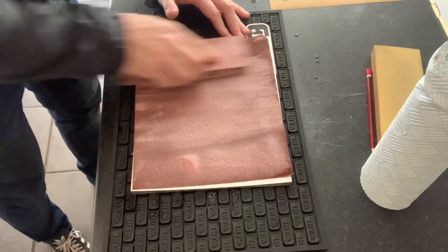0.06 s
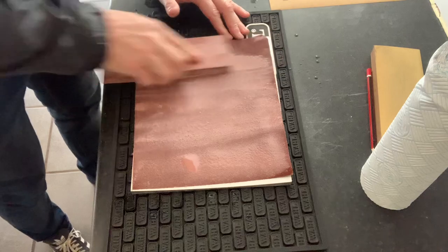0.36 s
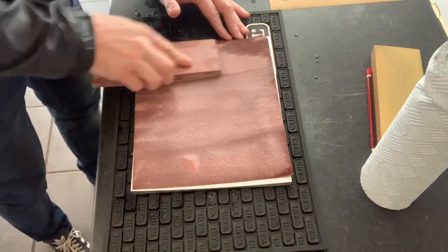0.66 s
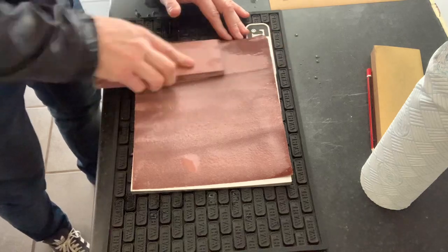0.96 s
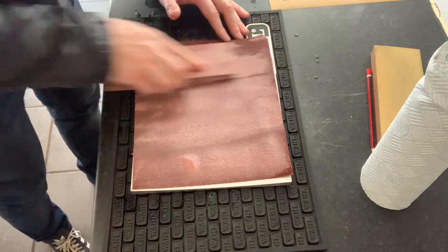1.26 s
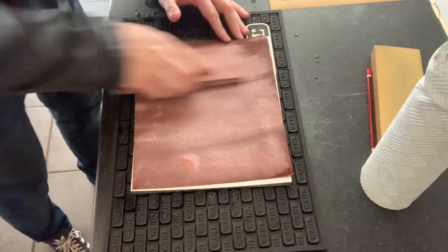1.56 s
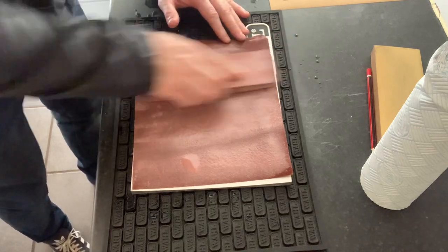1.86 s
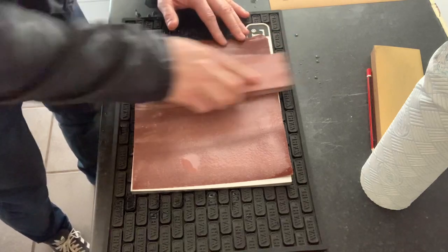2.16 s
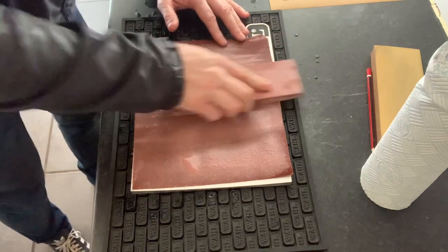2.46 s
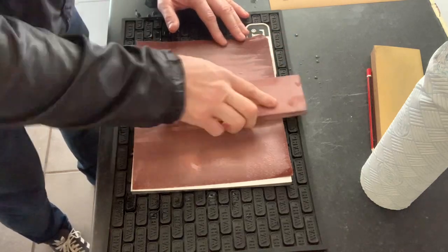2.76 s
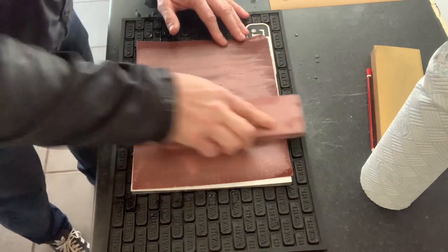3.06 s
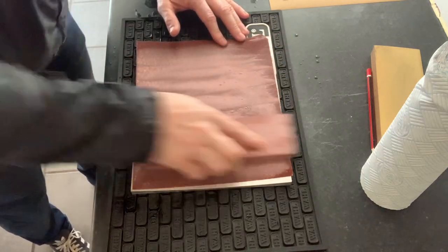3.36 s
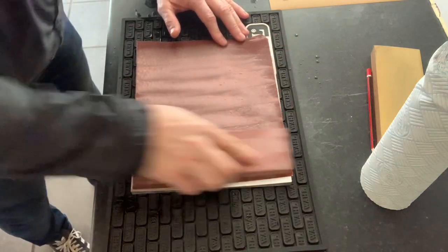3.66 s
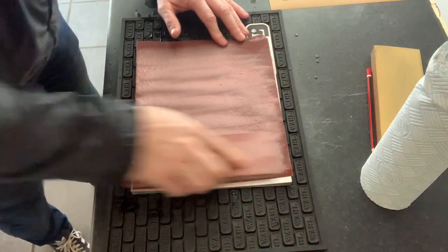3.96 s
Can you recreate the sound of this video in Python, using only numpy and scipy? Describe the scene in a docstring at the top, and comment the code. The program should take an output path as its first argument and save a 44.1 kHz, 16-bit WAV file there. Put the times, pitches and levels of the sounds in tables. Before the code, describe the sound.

A small sharpening stone rubs back and forth on an abrasive sheet for all four seconds, about six gritty, slightly ringing strokes a second, easing a little later on. Its edge catches sharply several times in the first second and again at 2 seconds. The desk rumbles faintly with each turn. A low hum swells from 0.5 seconds and fades by 1.7. The sound is close, in a small room.

```python
"""A small sharpening stone rubs to and fro on an abrasive sheet on a desk, about six strokes a second.
Grit catches under it, louder and brighter with speed, and rings the stone and the sheet's backing.
Each turn shakes the desk; at some the stone's edge bites. Hollow resonances flare in the scrape.
A low hum swells and fades in the small room. Two microphone ports hear it from close above."""
import sys
import numpy as np
from scipy import signal
from scipy.fft import rfft, irfft, next_fast_len
from scipy.io import wavfile
from scipy.ndimage import uniform_filter1d, map_coordinates

SR = 44100
rng = np.random.default_rng(int(sys.argv[2]) if len(sys.argv) > 2 else 0)


def file_out(sig):
    """Save sig as 16-bit WAV at sys.argv[1]."""
    # one column per channel
    cols = np.atleast_2d(sig).T
    # limit, then scale
    lim = np.clip(cols, -1, 1)
    pcm = np.round(lim * 32767).astype(np.int16)
    wavfile.write(sys.argv[1], SR, pcm)


N = 176400

# push and pull in turn: (start [s], gain [dB], bass [dB], treble [dB], growth over the stroke [dB])
STROKE_PLAN = [ (.018, -24.7, -.8, 0, .5), (.176, -28.2, 0, .8, -1.5), (.34, -23.9, 0, .4, 1.5),
               (.51, -26.2, -1, -.8, -2), (.669, -23.9, -1, -1.8, -.5), (.837, -27, .3, .7, .5),
               (.997, -24.3, 1.2, .4, 0), (1.161, -27.4, -1.2, .9, -3.5), (1.329, -24.7, .2, -2.3, 0),
               (1.483, -28.1, 1.3, -.6, -1), (1.648, -26.4, 1.5, 2, -2), (1.812, -27.7, 0, .5, -1),
               (1.981, -27.4, 1.5, .7, .5), (2.14, -28.7, -2, .6, 0), (2.303, -27, .8, -1, 0),
               (2.462, -28, .5, -.3, 0), (2.626, -26.5, .6, -1, 1), (2.789, -28.9, .8, -1, 1),
               (2.951, -25.9, -2, -1.6, .5), (3.105, -28.6, .3, -.8, -2.5), (3.262, -27.1, -2, .3, -2),
               (3.419, -29.3, -.2, -.9, -1), (3.577, -27.3, -1, 2.4, .5), (3.727, -30.9, .8, 3.8, -3),
               (3.881, -27.2, -1.2, -.6, 1), ]
# stone modes: (frequency [Hz], width [Hz], gain [dB])
STONE_MODES = [(1670, 90, -20.5), (1890, 90, -20.5), (2375, 60, -18.5), (2860, 70, -17.5),
               (3170, 380, -13.5), (4140, 45, -18.5), (5710, 110, -11), (5860, 130, -11), (7650, 120, -10),
               (9820, 120, -8.5), (12210, 80, -13.5), (14860, 100, -28)]
# grit rasp: (frequency [Hz], relative density [dB])
RASP_SPECTRUM = [(150, -16), (330, -17), (650, -12.5), (850, -13), (1500, -4.8), (2000, -2), (2600, -2.4),
                 (3500, -1.6), (4900, -2.8), (6100, -2), (6700, -5.5), (7400, -3.5), (8200, -.8),
                 (9500, -2), (10500, -5.5), (12000, -5.3), (13000, -16), (14600, -26), (15600, -38)]
# speed exponents of the rasp's amplitude: (bass [-], middle [-], treble [-])
RASP_EXPONENTS = [.55, .72, 1.55]
# speed exponents of the stone modes' amplitude: (low [-], high [-])
RING_EXPONENTS = [0.86, 1.86]
# backing modes: (frequency [Hz], width [Hz], relative level [dB])
BACKING_MODES = [(392, 67, -2), (707, 87, -3), (958, 29, -1), (1180, 81, 0.5), (1277, 320, 2.5)]
# backing, stronger as the strokes move forward: (time [s], gain [dB])
BACKING_GAIN_DB = [(0, -47), (1.2, -52.5), (1.8, -43), (2.7, -42), (4, -43.5)]
# desk rumble: (frequency [Hz], relative density [dB])
DESK_SPECTRUM = [(22, -56), (31, -43), (38, -8), (48, 0.5), (62, -5.5), (72, -7.5), (88, 0), (108, -13.5),
                 (140, -17), (185, -21.5), (400, -36.5)]
# desk shudder: (time [s], gain [dB])
DESK_GAIN_DB = [(0, -42), (1.2, -39.5), (2, -41.5), (2.7, -43.5), (3.3, -44), (3.85, -38)]
# edge bites: (time [s], gain [dB])
BITE_EVENTS = [(.182, -30), (.352, -33), (0.521, -26), (.683, -42), (0.845, -28.5), (1.996, -28),
               (2.318, -46), (2.472, -46), (2.803, -48), (3.272, -38), (3.428, -51), (3.735, -43)]
# bite noise: (frequency [Hz], relative density [dB])
BITE_SPECTRUM = [(200, -19), (1200, -3.5), (2000, 10.5), (3200, 1), (4500, -30), (5800, -28), (6700, -14),
                 (7700, 11), (8800, -28), (9700, 6), (11000, -25), (15000, -32)]
# hollow flares: (time [s], half length [s], frequency [Hz], width [Hz], gain [dB])
FLARE_EVENTS = [(.2, .017, 3080, 450, -28), (.46, .03, 2950, 250, -32), (.537, .013, 3200, 500, -28),
                (.785, .03, 1900, 250, -38), (.91, .05, 1720, 350, -37), (1.09, .05, 1900, 300, -35),
                (1.59, .03, 2430, 150, -37), (1.756, .026, 4145, 45, -29), (1.857, .021, 4160, 45, -31),
                (2.064, .06, 4130, 60, -38), (2.36, .04, 3000, 400, -35), (2.55, .06, 1480, 280, -40),
                (2.558, .06, 4140, 60, -40), (2.704, .05, 4152, 60, -36), (2.69, .025, 2800, 700, -33),
                (2.744, .035, 376, 90, -41), (2.87, .05, 1500, 280, -40), (3.016, .035, 2807, 200, -30),
                (3.246, .021, 699, 120, -44), (3.396, .022, 550, 120, -46), (3.79, .05, 1640, 120, -42)]
# hum: (time [s], pitch [Hz], level [dB])
HUM_TRACK = [(.3, 43.7, -60), (.53, 45.6, -41), (.74, 46, -37), (.88, 47.3, -30), (1.08, 49.2, -27.5),
             (1.22, 50.5, -35), (1.56, 50.5, -34), (1.73, 50.4, -52), (2.2, 50.4, -47), (4, 50, -58)]
# room decay: (frequency [Hz], T60 [s])
ROOM_T60_S = [(200, 0.46), (2000, 0.18), (6000, 0.39), (12000, 0.014)]
# room tone: (frequency [Hz], relative density [dB])
AIR_SPECTRUM = [(30, -30), (100, -3), (300, -4), (1000, -9), (4000, -19), (15000, -40)]
# likeness of the ports: (frequency [Hz], coherence [-])
PORT_COHERENCE = [(60, .95), (200, .86), (450, .62), (1200, .56), (2000, .6), (3300, .42), (5300, .25),
                  (5780, .75), (6600, .35), (7600, .87), (8300, 1), (9500, .99), (10200, .92), (11000, .62),
                  (11700, .7), (12600, 1)]
# phase between the ports: (frequency [Hz], left lead [rad])
PORT_LEAD_RAD = [(260, 0), (520, -1.5), (950, -.6), (1810, -.5), (2700, -1.6), (4130, -1.1), (4600, -2),
                 (5300, -1.7), (5780, -2.8), (6400, -4.3), (8200, -3.2), (10200, -3.05), (11000, -1.7),
                 (12200, -.9), (12500, 0)]

BASS_EDGE_HZ, TREBLE_EDGE_HZ = 2300, 7050
TIME_S = np.arange(N) / SR


def amp(db):
    return 10 ** (np.asarray(db) / 20)


def unit_rms(x):
    return x / np.sqrt(np.mean(x ** 2) + 1e-20)


def log_interp(points, hz):
    knots_hz, values = np.transpose(points)
    return np.interp(np.log(hz + 1), np.log(knots_hz + 1), values)


def curves(rows):
    """Per-sample values of each column after the time."""
    knots_s, *columns = np.transpose(rows)
    return [np.interp(TIME_S, knots_s, column) for column in columns]


def wobble(rate_hz):
    """Smooth random curve."""
    return map_coordinates(rng.standard_normal(int(N * rate_hz / SR) + 4), [TIME_S * rate_hz])


def bell(offset_s, half_s):
    return np.exp(-(offset_s / half_s) ** 2)


def filtered(x, response):
    size = next_fast_len(N + SR // 2)
    return irfft(rfft(x, size) * response(np.fft.rfftfreq(size, 1 / SR)), size)[..., :N]


def coloured(x, spectrum):
    return unit_rms(filtered(x, lambda f: amp(log_interp(spectrum, f))))


def resonance(x, hz, width_hz):
    return unit_rms(filtered(x, lambda f: 1j * f * width_hz / (hz * hz - f * f + 1j * f * width_hz)))


def snag(age_s, rise_s=.003, fall_s=.026):
    """Envelope of a catch: grips at once, lets go more slowly."""
    age_s = np.maximum(age_s, 0)
    return (1 - np.exp(-age_s / rise_s)) * bell(age_s, fall_s)


def hand(end_s=4.03, grip=1.15, creep=.1):
    """Stroke motion: time since the turn, position, speed, and overall, bass and treble gains."""
    start_s, gain_db, bass_db, treble_db, growth_db = np.transpose(STROKE_PLAN)
    turns_s = np.r_[2 * start_s[0] - start_s[1], start_s, end_s]
    count = np.interp(TIME_S, turns_s, np.arange(-1, len(start_s) + 1))
    stroke = np.clip(count.astype(int), 0, len(start_s) - 1)
    phase = count % 1
    since_turn_s = TIME_S - start_s[stroke]
    arc = np.sin(np.pi * phase ** .94)  # peaks before mid-stroke
    arc = arc ** np.where(stroke % 2, 1.11, 1.25)  # push more peaked than pull
    speed = np.hypot(np.tanh(grip * arc), creep)  # levels off; never zero
    speed += .15 * snag(since_turn_s - .011)  # sticks, then breaks loose
    gains = amp([gain_db[stroke] + growth_db[stroke] * (phase - .5), bass_db[stroke], treble_db[stroke]])
    return since_turn_s, np.cos(np.pi * count), speed, *uniform_filter1d(gains, size=400, axis=1)


def grit_impacts(speed, rate_hz=14000, spread_db=3.5, judder_db=.32, uneven_db=.7):
    """Two streams of tiny impacts of uneven size, denser with speed."""
    density_hz = rate_hz * np.sqrt(speed)
    hits = rng.random((2, N)) < density_hz / SR
    sizes = amp(spread_db * np.clip(rng.standard_normal((2, N)), -3, 2.5))
    signs = rng.choice([-1, 1], (2, N))
    flutter = amp(judder_db * wobble(220) + uneven_db * wobble(29.92))
    return unit_rms(hits * sizes * signs / np.sqrt(density_hz)) * flutter


def stone_ring(speed, gain, wander_db=2.4, stroke_share=.96):
    """Grit rings the stone's modes, which wax and wane as the contact shifts."""
    grit = grit_impacts(speed)
    ring = 0
    for hz, width_hz, db in STONE_MODES:
        mode = unit_rms(amp(wander_db * wobble(11)) * resonance(grit, hz, width_hz))
        exponent = np.interp(hz, [BASS_EDGE_HZ, TREBLE_EDGE_HZ], RING_EXPONENTS)
        ring += mode * amp(db) * speed ** exponent
    return (stroke_share * gain + (1 - stroke_share) * gain.mean()) * ring


def streaked(x, depth_db=2.7):
    """Narrow-band streaks of random gain, each about half a stroke long."""
    frames = signal.stft(x, nperseg=1024)[2]
    streaks = uniform_filter1d(rng.standard_normal(frames.shape[1:]), size=2, axis=0)
    streaks = unit_rms(uniform_filter1d(streaks, size=9, axis=1))
    return unit_rms(signal.istft(frames * amp(depth_db * streaks), nperseg=1024)[1][:, :N])


def grit_rasp(speed, gain, bass_gain, treble_gain, trim_db=1.2):
    """Rubbing noise in three bands; the treble needs the most speed."""
    rub = amp(trim_db) * streaked(coloured(grit_impacts(speed), RASP_SPECTRUM))
    bass = filtered(rub, lambda f: 1 / (1 + (f / BASS_EDGE_HZ) ** 4))
    treble = filtered(rub, lambda f: 1 - 1 / (1 + (f / TREBLE_EDGE_HZ) ** 6))
    bands = [bass * bass_gain, rub - bass - treble, treble * treble_gain]
    return gain * sum(band * speed ** exponent for band, exponent in zip(bands, RASP_EXPONENTS))


def backing(speed):
    """Grit drives the sheet's backing: a low, woody body."""
    grit = grit_impacts(speed)
    body = unit_rms(sum(amp(db) * resonance(grit, hz, width_hz) for hz, width_hz, db in BACKING_MODES))
    return amp(curves(BACKING_GAIN_DB)[0]) * np.sqrt(speed) * body


def desk_shudder(since_turn_s, peak_s=.024, half_s=.031):
    """The desk shudders just after each turn and rumbles on under the stroke."""
    force = (1 + bell(since_turn_s - peak_s, half_s)) * rng.standard_normal((2, N))
    return amp(curves(DESK_GAIN_DB)[0]) * coloured(force, DESK_SPECTRUM)


def edge_bites():
    """The stone's edge digs into the grit at some turns."""
    envelope = sum(amp(db) * snag(TIME_S - at_s) for at_s, db in BITE_EVENTS)
    return envelope * coloured(grit_impacts(speed=np.ones(N)), BITE_SPECTRUM)


def hollow_flares(speed):
    """Brief grit-driven resonances in the scrape."""
    grit = grit_impacts(speed)
    return sum(amp(db) * bell(TIME_S - at_s, half_s) * resonance(grit, hz, width_hz)
               for at_s, half_s, hz, width_hz, db in FLARE_EVENTS)


def hum(flutter_db=.18):
    """A deep tone rises a little in pitch as it swells, then fades."""
    hz, db = curves(HUM_TRACK)
    return amp(db + flutter_db * wobble(19)) * np.sqrt(2) * np.sin(2 * np.pi * np.cumsum(hz) / SR)


def desk_bounce(x, position, gain=.4, delay_s=.0016, sweep_s=.000401):
    """Adds the reflection off the desk; its delay follows the stone."""
    read_index = np.arange(N) - SR * (delay_s + sweep_s * position)
    return x + gain * np.array([map_coordinates(stream, [read_index]) for stream in x])


def room_reverb(x):
    """Short small-room tail; the top treble dies first."""
    hz, age_s, frames = signal.stft(rng.standard_normal((2, SR // 2)), SR, nperseg=256)
    decay = amp(-60 * age_s / log_interp(ROOM_T60_S, hz)[:, None])
    tail = signal.istft(frames * decay, SR, nperseg=256)[1]
    return signal.fftconvolve(x, tail / np.linalg.norm(tail[0]), axes=1)[:, :N]


def mic_ports(x):
    """Two unrelated streams become left and right, partly coherent and shifted in phase."""
    def mid_side_gains(hz):
        angle_rad = np.arccos(np.clip(log_interp(PORT_COHERENCE, hz), -1, 1)) / 2
        return np.array([np.cos(angle_rad), np.sin(angle_rad)])

    mid, side = filtered(x, mid_side_gains)
    stereo = np.array([mid + side, mid - side])
    return filtered(stereo, lambda f: np.exp(.5j * np.outer([1, -1], log_interp(PORT_LEAD_RAD, f))))


def scene(air_db=-53, reverb_db=-10.5):
    """Stone, desk, hum and room tone at the two ports."""
    since_turn_s, position, speed, gain, bass_gain, treble_gain = hand()
    stone = stone_ring(speed, gain) + grit_rasp(speed, gain, bass_gain, treble_gain)
    scrape = stone + edge_bites() + hollow_flares(speed)
    rubbing = desk_bounce(scrape, position) + backing(speed)
    air = amp(air_db) * coloured(rng.standard_normal((2, N)), AIR_SPECTRUM)
    reverb = amp(reverb_db) * room_reverb(rubbing)
    return mic_ports(rubbing + reverb + desk_shudder(since_turn_s) + air) + hum()


def record(dry, low_cut_hz=34, top_hz=15700):
    """Steep low cut and hard upper band limit."""
    return filtered(dry, lambda f: (f < top_hz) * (1 - 1 / (1 + (f / low_cut_hz) ** 10)))


dry = scene()
out = record(dry)
file_out(out)
```